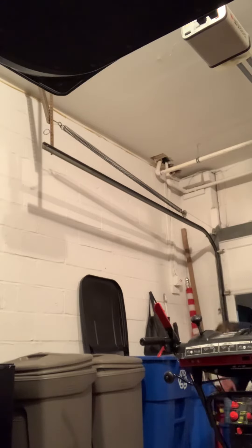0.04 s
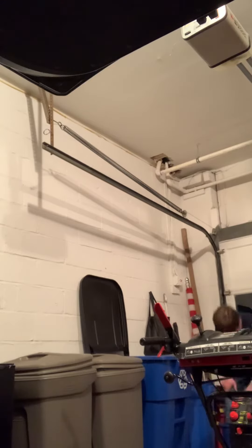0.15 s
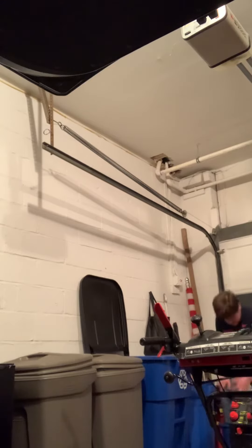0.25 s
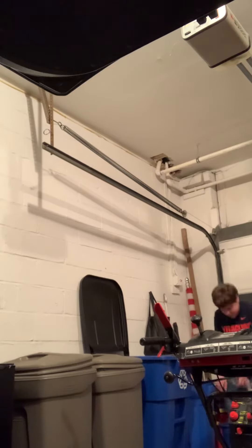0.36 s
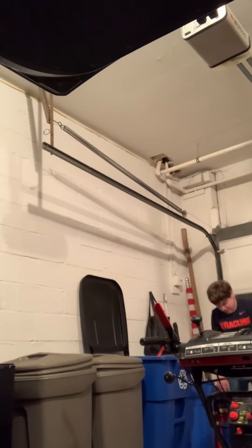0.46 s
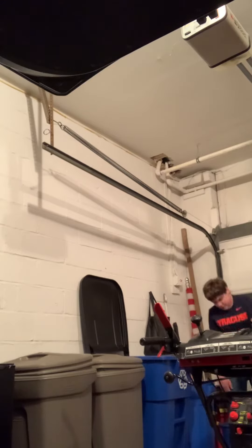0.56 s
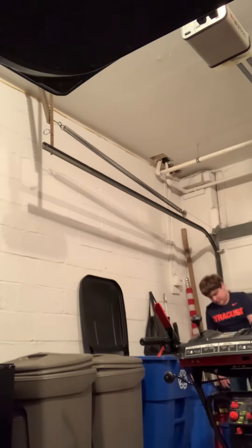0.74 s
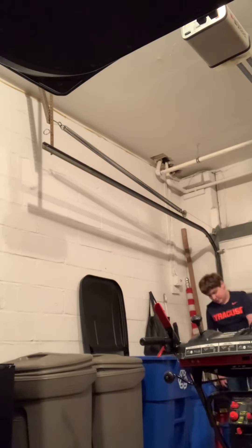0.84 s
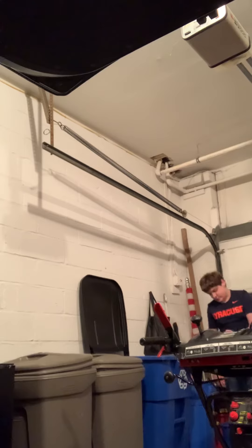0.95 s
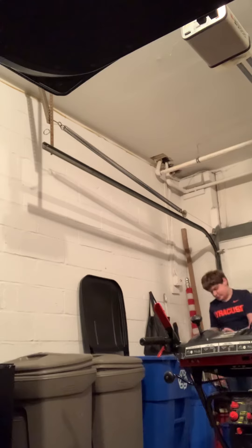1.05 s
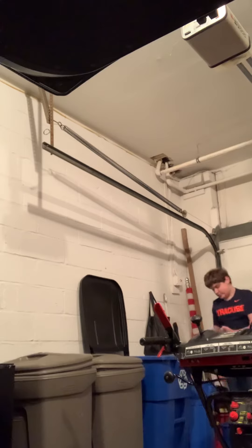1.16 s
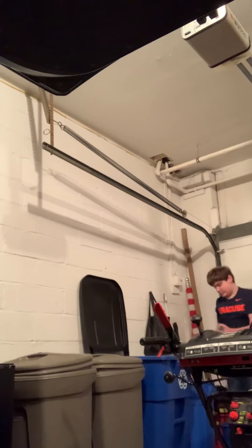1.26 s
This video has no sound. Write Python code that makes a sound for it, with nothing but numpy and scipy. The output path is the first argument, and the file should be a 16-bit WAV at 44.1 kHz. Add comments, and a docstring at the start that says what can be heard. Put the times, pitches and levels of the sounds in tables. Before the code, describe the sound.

Objects bang down on a plastic bin: a faint slide, a hollow double thump with a sharp crack, then a clatter of knocks and a last bang. It comes from the right in an echoing garage with a low hum.

```python
"""Setting things down by plastic bins

In a hard-walled garage, a short slide leads to a hollow double thump on a bin, with a sharp bang and its
rebound, then a clatter of panel knocks and hard clacks. Each blow is a burst of contact noise plus
ringing modes, and the walls ring after it. A machine hums low underneath. It all comes from the right."""
import sys
import numpy as np
from scipy import signal
from scipy.fft import rfft, irfft, next_fast_len
from scipy.io import wavfile
from scipy.ndimage import uniform_filter1d, map_coordinates

SR = 44100
rng = np.random.default_rng(int(sys.argv[2]) if len(sys.argv) > 2 else 0)


def transcribe(signal):
    """Save signal, clipped to [-1, 1], as a 16-bit WAV file at the path in sys.argv[1]."""
    frames = np.atleast_2d(signal).T
    limited = np.clip(frames, -1, 1)
    pcm = np.round(limited * 32767).astype(np.int16)
    wavfile.write(sys.argv[1], SR, pcm)


N = 57330
T = np.arange(N) / SR
FFT_SIZE = next_fast_len(2 * N)
HZ = np.fft.rfftfreq(FFT_SIZE, 1 / SR)

# hits on the bin: t/s, level/dB, ring length factor, thud gain over the boom/dB
BIN_HITS = [(0.2196, 4, 0.71, 6.5), (0.2721, 7, 1, 5.5), (.703, -16, 0.54, 18.5), (.872, -9, 1, 7),
            (1.112, -16, 0.69, 13)]
# the bin's hollow body: f/Hz, level/dB, t60/s
BIN_BODY = [(195, 0, .19), (213, -5, .17), (271, -10, .24), (308, -8, .24), (368, -15, .22),
            (390, -14, .23), (482, -22, .25), (609, -14, .27), (1410, -24, .15)]
# EQ of the wall's thud: f/Hz, gain/dB
THUD_EQ = [(115, -70.5), (165, -35.5), (215, 1), (400, -1), (650, -3), (950, -7), (1450, -3), (2000, -14.5),
           (3500, -16.5), (7000, -21), (14000, -54)]
def bin_thumps():
    """The struck hollow bin booms, and its wall gives a dull thud."""
    out = np.zeros((2, N))
    for start, db, length, thud_db in BIN_HITS:
        boom = in_garage(ring(BIN_BODY, attack_s=.003, length=length), send_db=-19)
        thud = in_garage(eq(contact_burst(t60=.11), THUD_EQ), send_db=3)
        out += delayed(start, amp(db) * (boom + amp(thud_db) * thud))
    return out


# clack hits: t/s, level/dB, burst t60/s, tilt/(dB per octave), burst reverb send/dB
CLACK_HITS = [(.2708, 15, .018, 1.8, 0), (.2768, 10, .02, -3, -5), (.7018, -6.5, .06, -1.5, -2),
              (.8418, -4, .014, 3, -3), (.8655, 0, .06, 0, 0), (.8840, 1, .06, 4, 1.5),
              (1.1082, -7, .018, 0, -3)]
# EQ of the hard contact: f/Hz, gain/dB
CLACK_EQ = [(130, -47.5), (400, -8), (650, 1), (850, 0.5), (1300, -9), (1550, 0), (1750, -6), (2100, -1.5),
            (2700, -1.5), (3100, -1.5), (3500, -1), (4300, -9.5), (5600, 1.5), (7400, -7), (8500, -5.5),
            (9500, -9.5), (11000, -11), (13000, -43), (15500, -17)]
# bright ring after a clack: f/Hz, level/dB, t60/s
CLACK_RING = [(795, -23, .3), (1066, -25, .45), (1541, -21, .62), (1552, -23.5, .62), (2040, -24, .38),
              (2396, -22, .38), (2643, -15.5, .36), (2832, -19, .26), (3025, -17.5, .38), (3160, -21, .45),
              (5740, -21, .26), (7297, -20.5, .24), (8055, -21, .22), (8450, -21, .2), (9792, -27, .2)]
def clacks():
    """Hard things strike with a sharp crack and a bright ring."""
    return blows(CLACK_HITS, CLACK_EQ, CLACK_RING)


# knock hits: t/s, level/dB, burst t60/s, tilt/(dB per octave), burst reverb send/dB
KNOCK_HITS = [(.0795, -24, .05, -7, 4.5), (.2704, 6, 0.016, -2.5, -9), (.7025, -5, 0.014, -0.5, 3.5),
              (.7555, -9.5, 0.22, -4, 4), (.8425, -0.5, 0.106, -2.5, 7.5), (.8503, -4, 0.048, -1.5, 12),
              (.8652, 11, 0.055, -2, -6), (.8765, -3.5, 0.076, -.5, 1), (1.1115, -9, 0.13, -5.5, -2),
              (1.218, -14, 0.31, -2.5, -5), (1.2952, 8.5, 0.45, 1.5, 15)]
# EQ of the contact on the panel: f/Hz, gain/dB
KNOCK_EQ = [(130, -36.5), (250, -11.5), (470, -9.5), (640, -1), (900, 2), (1200, 1.5), (1500, -4.5),
            (1800, 1), (2500, -2.5), (4200, 0), (6300, -4.5), (9000, -10), (15000, -37)]
# the panel's ring: f/Hz, level/dB, t60/s
PANEL_RING = [(582, -21, .18), (650, -21, .2), (762, -19, .22), (872, -18.5, .36), (925, -22, .3),
              (1711, -21, .3), (1772, -19, .3), (1893, -19.5, .3), (2032, -22, .28)]
def panel_knocks():
    """A stiff panel gives duller knocks that ring in the midrange."""
    return blows(KNOCK_HITS, KNOCK_EQ, PANEL_RING)


def blows(hits, contact_eq, modes):
    """Each impact excites a burst of dense, short resonances and a few longer modes."""
    out = np.zeros((2, N))
    for start, db, t60, tilt_db, send_db in hits:
        contact = in_garage(eq(contact_burst(t60), contact_eq, tilt_db), send_db)
        ringing = in_garage(ring(modes, attack_s=.0016), send_db=-9)
        out += delayed(start, amp(db) * (contact + ringing))
    return out


def contact_burst(t60, attack_s=.0016, smooth_hz=220):
    """The gritty chatter of one contact, with a flattened spectrum and unit energy."""
    grit = rng.standard_normal(N) * np.exp(.4 * wobble(940))
    burst = grit * decay(T, t60) * onset(T, attack_s)
    power = uniform_filter1d(np.abs(rfft(burst, FFT_SIZE)) ** 2, size=int(smooth_hz / HZ[1]))
    flat = filtered(burst, 1 / np.sqrt(np.abs(power) + 1e-20))
    return flat / np.linalg.norm(flat)


def ring(modes, attack_s, length=1):
    """Slightly unsteady damped modes struck from rest; each level sets a mode's energy."""
    out = np.zeros(N)
    for k, (hz, db, t60) in enumerate(modes):
        phase = 2 * np.pi * hz * T + .28 * wobble(30)
        mode = np.sin(phase) * decay(T, t60 * length) * onset(T, attack_s)
        out += (-1) ** k * amp(db) * mode / np.linalg.norm(mode)
    return out


# slide strokes: peak t/s, level/dB, 20 dB rise/s, 20 dB fall/s, tilt/(dB per octave)
SLIDE_STROKES = [(0.092, -57, 0.011, 0.19, -5.5), (.124, -52, 0.028, 0.036, 0)]
# EQ of the friction: f/Hz, gain/dB
SLIDE_EQ = [(100, -11.5), (250, 0), (600, 12.5), (1300, 9), (3000, 8), (4500, 8), (7500, 12.5),
            (11000, 7.5), (15000, 0.5)]
def slides():
    """Grainy friction swells and dies as something is dragged."""
    out = np.zeros(N)
    for peak, db, rise, fall, tilt_db in SLIDE_STROKES:
        rub = unit_rms(rng.standard_normal(N) * np.exp(.11 * wobble(500)))
        swell = amp(-20 * np.maximum((peak - T) / rise, (T - peak) / fall))
        out += amp(db) * eq(rub * swell, SLIDE_EQ, tilt_db)
    return in_garage(out, send_db=-3.5)


# reverb time of the garage: f/Hz, t60/s
GARAGE_T60 = [(150, 0.5), (400, 0.64), (900, 0.66), (2000, 0.7132), (3500, 0.5568), (6000, 0.5348),
              (9000, 0.3828), (15000, 0.2037)]
# EQ of the reverb: f/Hz, gain/dB
GARAGE_EQ = [(200, 4.5), (1000, -5.5), (2500, -1.2), (6000, -1), (12000, 3)]
def in_garage(x, send_db, predelay_s=.0016):
    """The direct sound plus a fresh tail of wall echoes; the high treble dies first."""
    hz, t, bands = signal.stft(diffuse_noise(), SR, nperseg=256)
    bands = bands * decay(t, curve(GARAGE_T60, hz)[:, None])
    tail = signal.istft(bands, SR, nperseg=256)[1][:, :N]
    tail = tail * onset(np.maximum(T - predelay_s, 0), attack_s=.00057)
    tail = eq(unit_rms(tail) / np.sqrt(N), GARAGE_EQ)
    return x + amp(send_db) * filtered(x, rfft(tail, FFT_SIZE))


# motor tones: f/Hz, level/dB
MOTOR_TONES = [(49, -49), (58.4, -50), (97, -61), (120, -58.5), (235.5, -55.5)]
def machine_hum():
    """Low motor tones beat together, each wavering a little in level and phase."""
    out = np.zeros(N)
    for hz, db in MOTOR_TONES:
        gain = amp(db + .7 * wobble(5.95))
        phase = 2 * np.pi * hz * T + .08 * wobble(8.1)
        out += gain * unit_rms(np.sin(phase))
    return out


# EQ of the still air: f/Hz, gain/dB
AIR_EQ = [(20, -29), (32, -20.5), (48, 18.5), (85, 16.5), (140, 1.5), (220, 11), (320, 5), (500, -2),
          (900, -10.5), (2500, -9.5), (5000, -21.5), (8000, -35), (15000, -52)]
# EQ of the opening echo: f/Hz, gain/dB
ECHO_EQ = [(200, -11.5), (700, -6), (2000, -3), (5500, 30.5), (8000, 10.5), (14000, 8)]
def room_air():
    """A soft rumble of still air, and a bright echo already dying as the scene opens."""
    air = unit_rms(filtered(diffuse_noise(), amp(curve(AIR_EQ))))
    echo = unit_rms(filtered(diffuse_noise(), amp(curve(ECHO_EQ))))
    return amp(-49) * air + amp(-64) * echo * decay(T, t60=.31)


# likeness of left and right in the room sound: f/Hz, coherence (0 to 1)
COHERENCE = [(150, .99), (450, .93), (900, .9), (1150, .55), (1550, .2), (2000, .55), (3200, .15),
             (4600, .94), (7000, .76), (15000, .7)]
def diffuse_noise():
    """Stereo noise like sound from the walls: nearly mono in the bass, wider above."""
    width = np.arccos(np.clip(curve(COHERENCE), 0, 1)) / 2
    mid, side = filtered(rng.standard_normal((2, N)), np.array([np.cos(width), np.sin(width)]))
    return np.array([mid + side, mid - side])


# stereo balance: f/Hz, left over right/dB
BALANCE = [(60, 0.7), (280, 2.5), (600, 0.5), (1000, -1.5), (1500, -2.5), (2500, 0.5), (10000, 0)]
# extra phase lag of the left side: f/Hz, lag/rad
LEFT_PHASE_LAG = [(100, 0), (300, .15), (600, 1), (1400, .9), (1700, -.3), (2100, -.8), (2600, -.2),
                  (4000, 0), (4700, -.25), (6500, 0)]
def from_the_right(x, lag_s=.000116):
    """Sound from the right reaches the left side a little later; the balance varies with frequency."""
    split = np.array([[.5], [-.5]])  # left, right
    phase_lag = 2 * np.pi * HZ * lag_s + curve(LEFT_PHASE_LAG)
    return filtered(x, amp(split * curve(BALANCE)) * np.exp(-1j * split * phase_lag))


def amp(db):
    return 10 ** (np.asarray(db) / 20)


def unit_rms(x):
    return x / np.sqrt(np.mean(x ** 2) + 1e-20)


def onset(t, attack_s):
    return 1 - np.exp(-t / attack_s)


def decay(t, t60):
    return amp(-60 * t / t60)


def delayed(seconds, x):
    return np.pad(x, ((0, 0), (round(seconds * SR), 0)))[:, :N]


def wobble(rate):
    """A smooth random curve with `rate` knots a second."""
    return map_coordinates(rng.standard_normal(N), [T * rate + 2])


def curve(points, hz=HZ):
    """Breakpoints joined on a log frequency axis."""
    freqs, values = np.transpose(points)
    return np.interp(np.log(hz + 1), np.log(freqs + 1), values)


def filtered(x, response):
    return irfft(rfft(x, FFT_SIZE) * response, FFT_SIZE)[..., :N]


def eq(x, points, tilt_db=0):
    """Minimum-phase EQ, so hits have no pre-ring, tilted by tilt_db per octave about 3 kHz."""
    octaves = np.log2(np.maximum(HZ, 300) / 3000)
    cepstrum = irfft(np.log(amp(curve(points) + tilt_db * octaves)), FFT_SIZE)
    cepstrum[1:FFT_SIZE // 2] *= 2
    cepstrum[FFT_SIZE // 2 + 1:] = 0
    return filtered(x, np.exp(rfft(cepstrum)))


def scene():
    """Hits and slide over the bed of hum and air, placed to the right."""
    action = clacks() + panel_knocks() + bin_thumps() + slides()
    return from_the_right(action + machine_hum() + room_air())


def record(dry, cutoff_hz=15900):
    """A steep low-pass takes off the very top."""
    return filtered(dry, 1 / np.sqrt(1 + (HZ / cutoff_hz) ** 140))


dry = scene()
out = record(dry)
transcribe(out)
```